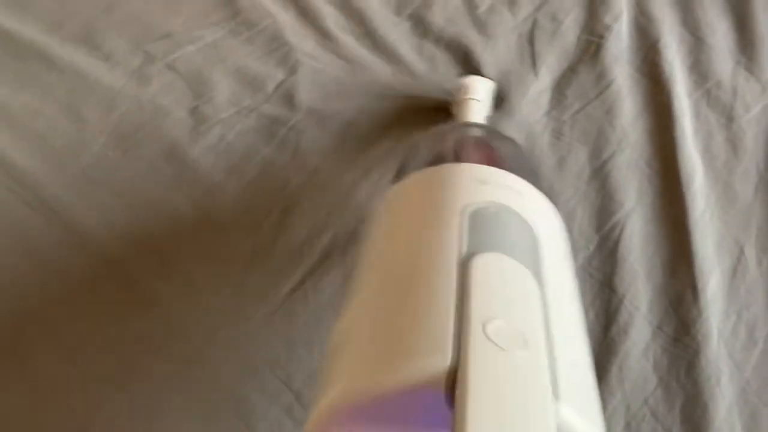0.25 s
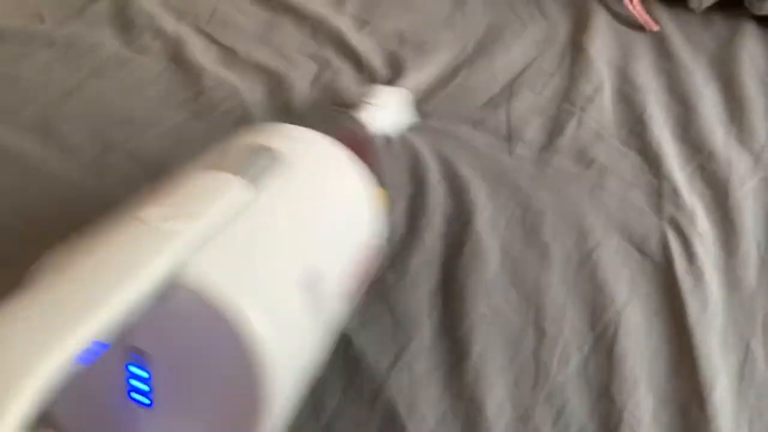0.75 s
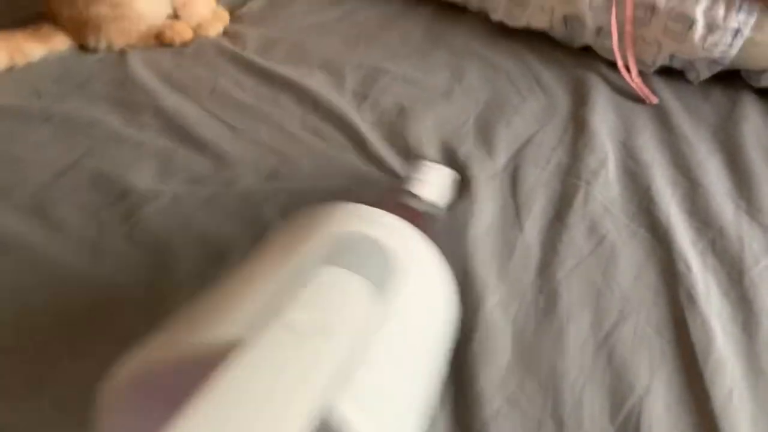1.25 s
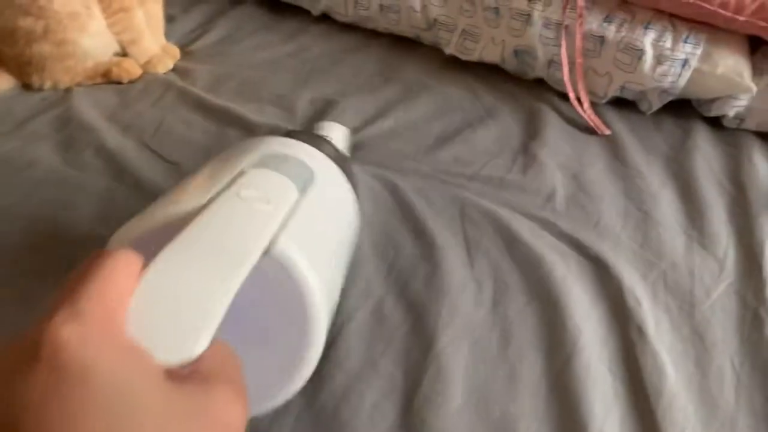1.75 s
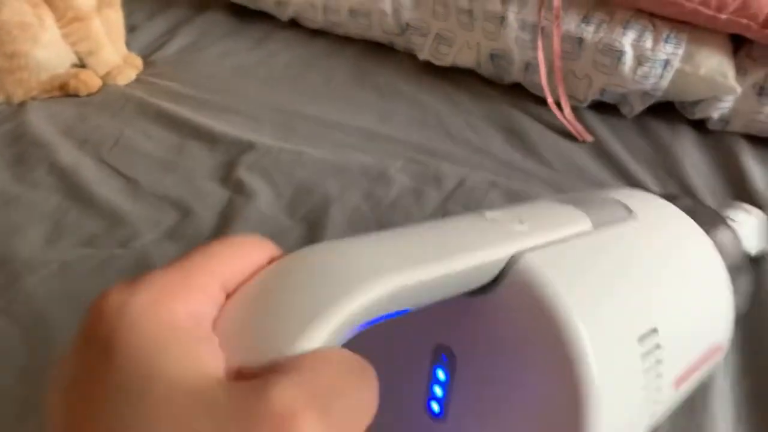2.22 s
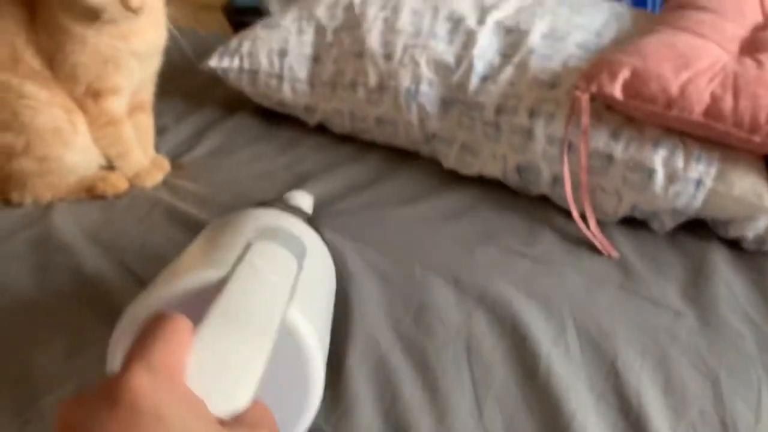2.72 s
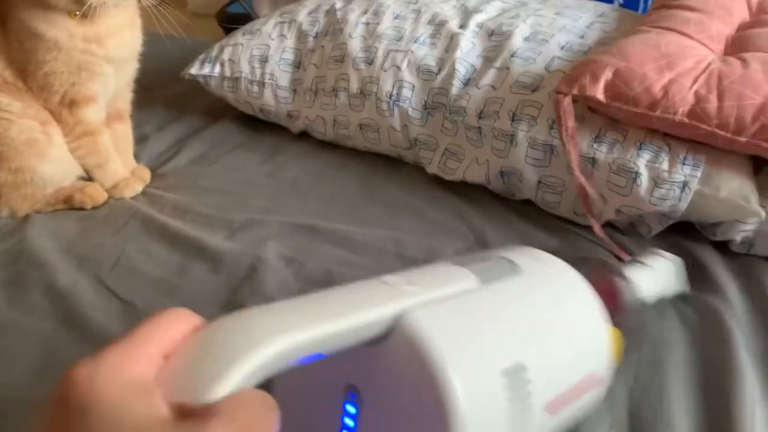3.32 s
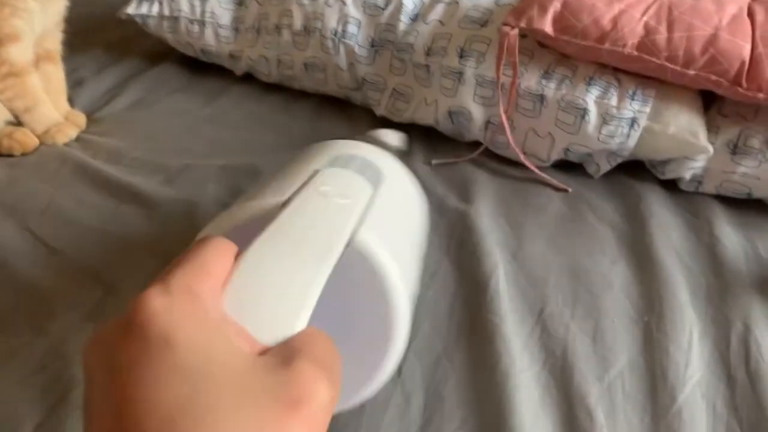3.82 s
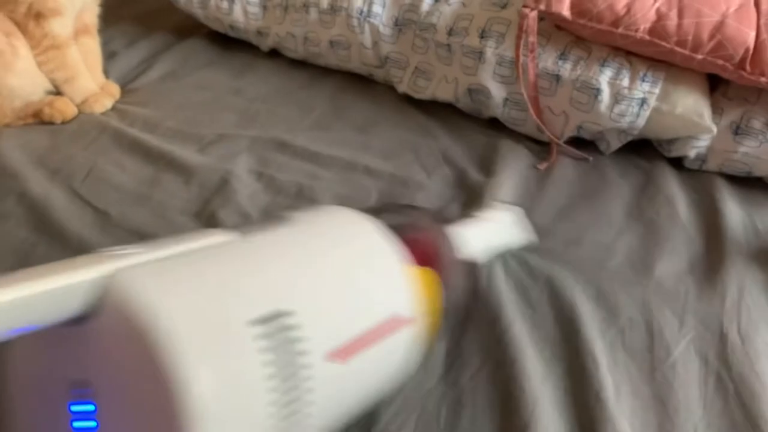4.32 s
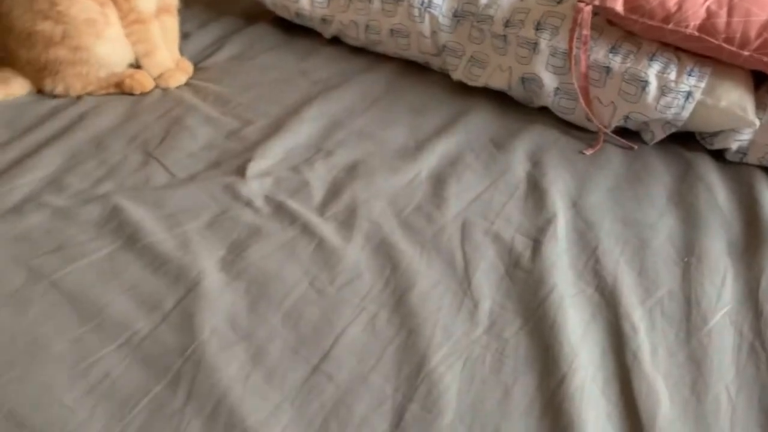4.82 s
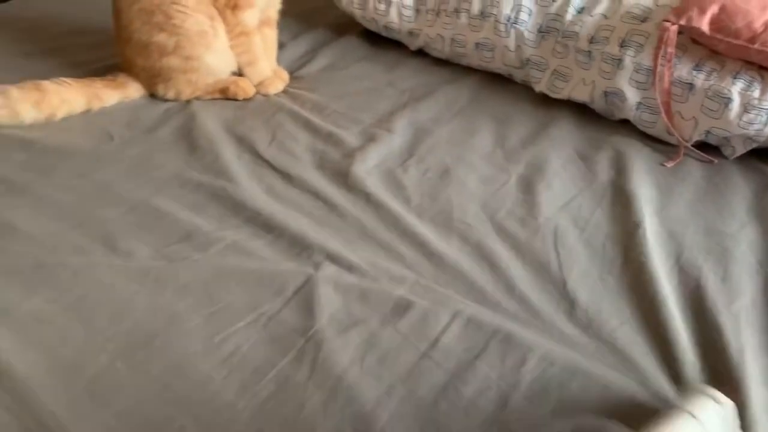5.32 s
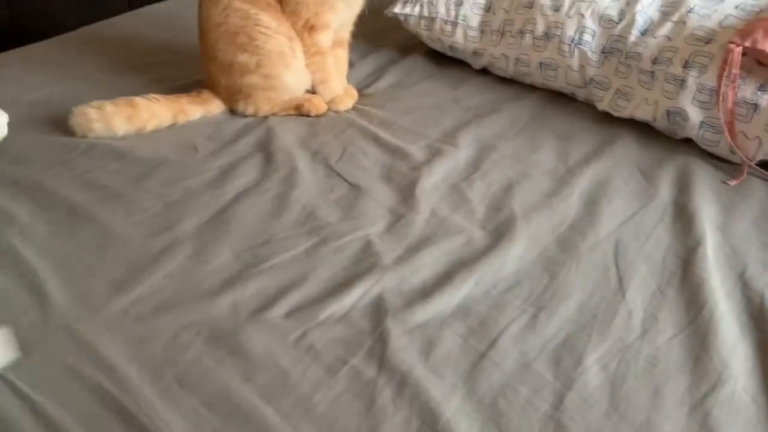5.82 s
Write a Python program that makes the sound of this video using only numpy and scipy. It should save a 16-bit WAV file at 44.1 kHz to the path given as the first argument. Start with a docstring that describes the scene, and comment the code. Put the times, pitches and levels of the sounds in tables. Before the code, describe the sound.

A phone close to a small vacuum catches its motor already turning and rising in pitch, with a thin electronic tone at first and brief ringing from the plastic housing. A bright whine emerges within a second and shifts between left and right as the machine is swept. Air roars steadily, surging and hissing with each nozzle stroke on cloth, over a faint low room drone.

```python
"""A cordless hand vacuum spins up and is swept to and fro over a bed sheet, close to a phone.
Over a steady room drone the shaft hum climbs, beside a thin tone that soon sinks; the housing rings
as the rising harmonics pass through it. Air noise and a singing bearing grow, then the seven-blade fan
whines and whistles. Six strokes each lift the rush, hiss, hollow nozzle note, buzz and whistle.
Tones are sines locked to the shaft's turning, except the thin one; air and room are coloured noise."""
import sys
import numpy as np
from scipy import signal
from scipy.fft import rfft, irfft, next_fast_len
from scipy.io import wavfile
from scipy.ndimage import map_coordinates

SR = 44100
rng = np.random.default_rng(int(sys.argv[2]) if len(sys.argv) > 2 else 0)


def store_pcm(level_fs):
    """Save levels as 16-bit WAV."""
    pcm = np.round(np.clip(level_fs, -1, 1) * 32767).astype(np.int16)
    wavfile.write(sys.argv[1], SR, np.atleast_2d(pcm).T)


N = 267246
TIME = np.arange(N) / SR  # seconds

# The room's steady drone: pitch_hz, relative level_db (per Hz)
ROOM_SPECTRUM = [(20, -32), (31, -28), (40, -8), (50, 0.5), (65, -10), (110, -21), (300, -12),
                 (1000, -35.5)]
# How alike noise is at the two microphones: pitch_hz, correlation (-1 to 1)
LIKENESS = [(60, .95), (250, .75), (700, .45), (1300, -.25), (1700, -.08), (3200, -.39), (4500, .44),
            (5700, .07), (6750, -.98), (7300, -.98), (8400, .8), (9700, .55), (10600, .72), (11000, -.98),
            (12200, -.98), (12450, .95), (13400, .95), (13600, .45)]
# Balance of noise between the microphones: pitch_hz, left_minus_right_db
BALANCE = [(110, -.5), (200, -1), (380, -3), (700, 6.5), (1290, 3), (2380, 1), (4400, -0.5)]

# Soft start: the shaft rate rises evenly from this value for this long
START_HZ, SOFT_START_S = 232, .36
# Free run-up: full shaft rate, time constant, time the motor has already been turning
FULL_HZ, RUN_UP_S, HEAD_START_S = 439.4, .726, .418
# The last few turns a second come slowly
CREEP_HZ, CREEP_S = 5.4, 1.56
# The motor sags a little just after each stroke has pressed the nozzle down
SAG_HZ, SAG_LATE_S, SAG_S = 1.4, .12, .3
# Strokes over the sheet: far_end_s, half_length_s, rush_rise_db, hiss_rise_db, hollow_rise_db,
# buzz_rise_db, whistle_rise_db, whistle_late_s
STROKES = [(0.54, 0.24, 4, 8.5, 4, 1, 3, .1), (1.411, 0.32, 4.5, 5, 5.5, 5, 10.5, 0.0088),
           (2.251, 0.24, 6, 6, 13.5, 5.5, 10, 0.18), (3.207, 0.2, 2.5, 5, 13.5, 3, 9, 0.083),
           (4.168, 0.33, 5, 9.5, 10, 4, 15, 0.02), (5.345, 0.44, 7, 9, 3.5, 11.5, 11, 0.066)]
HOLLOW_EARLY_S = 0.11  # the hollow note comes as the nozzle seals

# Hum of the unbalanced shaft: time_s, level_db
HUM_LEVEL = [(0, -46), (.06, -38.5), (.15, -60), (.3, -45.5), (.62, -43), (.7, -30.5), (.88, -36.5),
             (1.25, -30.5), (1.68, -38), (2.25, -34), (2.76, -37.5), (3.3, -34), (3.69, -38), (4.2, -32.5),
             (4.58, -47), (4.78, -49.5), (5.12, -30.5), (6.05, -38)]
HUM_PAN_DB, HUM_LAG_S = -0.4, 0.00043  # left minus right; the right microphone hears it later
# Thin tone, likely the speed controller's switching: levels under starting current and when running
DRIVE_HZ, DRIVE_START_DB, DRIVE_RUNNING_DB, DRIVE_SETTLE_S = 2013, -42.5, -54.7, .19
# Housing resonances: shaft_multiple (times the shaft rate), pitch_hz, width_hz, peak_db
CASING = [(5, 1235, 130, -38.5), (7, 1780, 130, -50), (7, 2080, 680, -55), (6, 2440, 190, -51.5),
          (10, 2980, 640, -54), (14, 4200, 290, -46), (14, 4860, 230, -50.5), (14, 5300, 700, -55),
          (14, 5860, 120, -46), (14, 6000, 40, -49), (13, 5560, 40, -52), (13, 5615, 30, -47),
          (18, 4700, 420, -60), (20, 5450, 1800, -61), (20, 6400, 220, -53), (20, 8200, 350, -50.5),
          (20, 8630, 40, -44), (21, 8500, 800, -48), (22, 8350, 300, -45)]
# Weaker shaft harmonics: shaft_multiple (times the shaft rate), level_db (full speed, between strokes),
# buzz_share (of a stroke's buzz), growth_db (per tenfold speed)
OVERTONES = [(5, -59, .7, 80), (6, -54, .95, 130), (8, -63, 1, 100), (9, -61, .8, 60),
             (13, -55.5, 1.15, 330), (14, -55.5, 1, 160), (17, -63.5, 1.1, 130), (18, -57, .9, 130),
             (20, -53.5, .9, 130), (25, -58, .9, 130), (28, -53.5, .6, 110), (32, -61, .7, 250),
             (33, -66, .7, 250)]
# Tenth harmonic, likely the commutator, rings out when the side vents face the phone: time_s, level_db
RING_LEVEL = [(0, -74), (.35, -63), (.54, -48), (.72, -54), (.85, -47), (1.0, -45), (1.2, -48), (1.4, -47),
              (1.5, -48), (1.62, -41), (1.95, -50), (2.36, -36), (2.6, -49.5), (2.85, -49.5), (3.1, -48.5),
              (3.5, -51), (3.9, -48.5), (4.15, -42.5), (4.45, -50), (4.7, -51), (5.05, -52), (5.2, -36.5),
              (5.3, -46), (5.45, -36.5), (5.7, -52.5), (6.05, -48)]
RING_MULTIPLE = 10
# Ball bearing: ball_multiple (times the ball-passing rate), level_db (full speed, between strokes),
# buzz_share (of a stroke's buzz), growth_db (per tenfold speed)
BEARING = [(1, -49.5, .3, 75), (3, -54.5, .9, 120)]
BALL_PASSES = 2.566  # per turn of the shaft

# Air noise colours: pitch_hz, relative level_db (per Hz)
# Low turbulence coloured by the housing
RUMBLE_SPECTRUM = [(20, -38), (31, -34), (45, -3.5), (68, -5), (100, -3.5), (160, -0.5), (260, 2), (400, 3),
                   (500, -6.5), (800, -35.5)]
# Rush from the vents
RUSH_SPECTRUM = [(300, -22), (520, -2), (720, 2.5), (900, 0.5), (1200, 1), (1600, -2.5), (2050, 1.5),
                 (2300, 1.5), (2650, -5), (3100, 1), (3450, 2), (3650, -5.5), (4400, -1), (5000, -6),
                 (6000, -1), (7500, -5.5), (12000, -13)]
# Hiss where the nozzle meets the sheet
HISS_SPECTRUM = [(2400, -38), (3500, -7), (4400, 0), (5000, -4), (6200, -19), (7000, -42), (8000, 2),
                 (8700, 2.5), (9200, 9), (9700, 5), (10500, 4), (11500, 1), (12600, 1), (13600, -5.5),
                 (14300, 0), (15500, -39)]
# Hollow resonance of the nozzle
HOLLOW_SPECTRUM = [(900, -24), (1300, -5), (1480, 1), (1650, 2), (1850, -15), (2200, -37)]
# Air levels at full speed between strokes, before the reflection; growth in dB per tenfold speed
RUMBLE_DB, RUSH_DB, HISS_DB, HOLLOW_DB = -42.5, -38.5, -39.5, -54
RUMBLE_GROWTH_DB, RUSH_GROWTH_DB, HISS_GROWTH_DB, HOLLOW_GROWTH_DB = 18, 26, 61, 16
RUMBLE_SHARE = 0.65  # of the rush's rise in each stroke

BLADES = 7
# Blade-passing whine, beamed from the vents: time_s, level_db
WHINE_LEVEL = [(0, -62), (.64, -60), (.69, -42), (.94, -34), (.97, -29.8), (1.15, -27.6), (1.45, -30.5),
               (1.67, -27.7), (2.02, -32.3), (2.06, -36.5), (2.11, -31.5), (2.29, -28), (2.44, -28.4),
               (2.52, -29.7), (2.59, -33), (2.63, -37), (2.77, -39), (2.83, -45.5), (2.86, -32.7),
               (3.01, -28.8), (3.4, -28.4), (3.53, -36.5), (3.62, -49), (3.7, -42), (3.78, -34), (3.9, -30),
               (4.03, -30.3), (4.12, -26), (4.33, -32), (4.48, -29.8), (4.69, -36.5), (4.78, -30),
               (4.87, -31.5), (4.97, -28), (5.06, -28), (5.21, -25.3), (5.44, -29.2), (5.53, -27.4),
               (5.62, -34), (5.68, -34.3), (5.74, -45.5), (5.77, -36.6), (6.05, -43)]
# Where the whine's beam points: time_s, left_minus_right_db
WHINE_PAN = [(.68, 11.7), (1.04, -1.2), (1.14, -1), (1.18, -4.3), (1.52, -5.5), (2.02, -5), (2.06, -1),
             (2.13, -4.5), (2.33, -.3), (2.5, -1), (2.62, -3.5), (2.99, -5.2), (3.08, 2), (3.29, -4.9),
             (3.44, 1.1), (3.59, -6.7), (4.19, 5.4), (4.43, -6.3), (4.88, .6), (4.97, -4.5), (5.12, 4),
             (5.45, -4.5), (5.6, 7.3), (5.87, -5.3), (6.05, 0)]
# Its extra path to the right microphone as the machine turns: time_s, path_m
WHINE_PATH = [(.72, .075), (.84, .096), (1.11, .072), (1.14, .057), (1.17, .051), (1.3, .054), (1.45, .068),
              (1.71, .084), (1.96, .063), (2.04, .072), (2.07, .057), (2.31, .037), (2.44, .045),
              (2.55, .065), (2.64, .072), (2.82, .028), (2.85, .055), (3.15, .039), (3.27, .058),
              (3.37, .059), (3.54, .086), (3.65, .056), (3.77, .08), (3.85, .062), (3.98, .05),
              (4.11, .059), (4.35, .113), (4.71, .146), (4.83, .138), (5.1, .069), (5.22, .053),
              (5.43, .067), (5.58, .095), (5.64, .131), (6.05, .155)]
SOUND_M_S = 343
# The whistle leaves the duct freely only above its cut-on pitch
WHISTLE_DB, WHISTLE_GROWTH_DB, CUT_ON_LOSS_DB = -42, 110, 34
CUT_ON_HZ, CUT_ON_WIDTH_HZ = 9026, 8
TOP_HZ = 15500  # the phone's upper limit


def undb(db):
    """Turn decibels into gain."""
    return 10 ** (np.asarray(db) / 20)


def over_time(table):
    """Join (time, value) points by straight lines."""
    time_s, value = np.transpose(table)
    return np.interp(TIME, time_s, value)


def over_hz(points, hz):
    """Read (pitch, value) points along a log-pitch axis, as hearing spaces pitch."""
    pitch_hz, value = np.transpose(points)
    return np.interp(np.log(hz + 1), np.log(pitch_hz), value)


def wander(rate):
    """Smooth chance: `rate` random values a second joined by a spline."""
    points = rng.standard_normal(4096)
    coarse_time = TIME[::64]
    coarse = map_coordinates(points, [coarse_time * rate], mode="wrap")
    return np.interp(TIME, coarse_time, coarse)


def swell(at_s, half_s):
    """A smooth rise and fall round one moment."""
    return np.exp(-((TIME - at_s) / half_s) ** 2)


def tone(phase, db):
    """A sine of the given rms level."""
    return np.sqrt(2) * undb(db) * np.sin(phase)


def beamed(phase, db, pan_db, lag_s):
    """A strong tone that reaches each microphone with its own level and delay."""
    lead = np.gradient(phase) * SR * lag_s
    left = tone(phase + lead / 2, db + pan_db / 2)
    right = tone(phase - lead / 2, db - pan_db / 2)
    return np.array([left, right])


def scattered(phase, db, fade_db, sway):
    """A weak tone whose reflections add and cancel as the machine moves, apart at each microphone."""
    hz = np.abs(np.gradient(phase)) * SR / (2 * np.pi)
    lead = np.arccos(over_hz(LIKENESS, hz))  # pitch sets the phase gap between microphones
    phase = phase + .5 * wander(12)
    db = db + fade_db * wander(6) + 1.5 * wander(30)
    left = tone(phase + lead / 2 + sway * wander(2.873), db)
    right = tone(phase - lead / 2 + sway * wander(2.873), db)
    return np.array([left, right])


def turbulence(spectrum, db):
    """Coloured noise at two microphones, alike or opposed depending on the wavelength."""
    size = next_fast_len(N)
    hz = np.fft.rfftfreq(size, 1 / SR)
    alike = over_hz(LIKENESS, hz)
    mid = rfft(rng.standard_normal(size)) * np.sqrt(1 + alike)
    side = rfft(rng.standard_normal(size)) * np.sqrt(1 - alike)
    lean = undb(over_hz(BALANCE, hz) / 2)
    both = np.array([(mid + side) * lean, (mid - side) / lean])
    pair = irfft(both * undb(over_hz(spectrum, hz)), size)[:, :N]
    return pair * undb(db) / pair.std()


def room():
    """The room's low drone is steady coloured noise."""
    return turbulence(ROOM_SPECTRUM, -53)


def shaft():
    """Turns a second: an even soft start, then steady torque against drag that grows as speed squared."""
    run_up = FULL_HZ * np.tanh((TIME + HEAD_START_S) / RUN_UP_S)
    creep = CREEP_HZ * np.exp(-TIME / CREEP_S)
    load = sum(swell(far_end_s + SAG_LATE_S, SAG_S) for far_end_s, *_ in STROKES)
    free = run_up - creep - SAG_HZ * load
    ramp_end_hz = np.interp(SOFT_START_S, TIME, free)
    ramp = np.interp(TIME, [0, SOFT_START_S], [START_HZ, ramp_end_hz])
    return np.where(TIME < SOFT_START_S, ramp, free)


def hum(angle):
    """The unbalanced shaft shakes the machine once each turn."""
    level_db = over_time(HUM_LEVEL) + wander(46)
    return beamed(angle, level_db, HUM_PAN_DB, HUM_LAG_S)


def drive():
    """The thin steady tone is loudest under the starting current and then sinks into the rush."""
    inrush = np.exp(-(TIME / DRIVE_SETTLE_S) ** 2)
    level_db = DRIVE_RUNNING_DB + (DRIVE_START_DB - DRIVE_RUNNING_DB) * inrush
    return scattered(2 * np.pi * DRIVE_HZ * TIME, level_db, fade_db=1.2, sway=.2)


def casing(angle, shaft_hz):
    """Each housing resonance sings briefly while a rising harmonic passes through it."""
    out = 0
    for multiple, pitch_hz, width_hz, peak_db in CASING:
        detune = 2 * (multiple * shaft_hz - pitch_hz) / width_hz
        harmonic = scattered(multiple * angle, peak_db, fade_db=.5, sway=.1)
        out = out + harmonic / (1 + detune ** 4)
    return out


def overtones(angle, speed, buzz_db):
    """Shaft harmonics grow with speed and buzz more under the load of each stroke."""
    out = 0
    for multiple, level_db, share, growth_db in OVERTONES:
        level_db = level_db + growth_db * speed + share * buzz_db
        out = out + scattered(multiple * angle, level_db, fade_db=2.5, sway=.3)
    return out


def commutator(angle):
    """The tenth harmonic rings out when the side vents face the phone."""
    return scattered(RING_MULTIPLE * angle, over_time(RING_LEVEL), fade_db=.5, sway=.2)


def bearing(angle, speed, buzz_db):
    """The balls passing by make tones that grow with speed and under the load of each stroke."""
    out = 0
    for multiple, level_db, share, growth_db in BEARING:
        level_db = level_db + growth_db * speed + share * buzz_db
        out = out + scattered(multiple * BALL_PASSES * angle, level_db, fade_db=1.5, sway=.2)
    return out


def bounced(pair, lag_s=.0022, sway_s=0.0005):
    """A nearby reflection whose path changes with the sweeping arm: a slowly moving comb."""
    earlier = TIME - lag_s - sway_s * wander(2.5)
    reflection = np.array([np.interp(earlier, TIME, x) for x in pair])
    return pair + .28 * reflection


def air(speed, rush_db, hiss_db, hollow_db):
    """Rumble of the body, rush from the vents, hiss and a hollow note where the nozzle meets the sheet."""
    rumble_db = RUMBLE_GROWTH_DB * speed + RUMBLE_SHARE * rush_db + 0.24 * wander(27)
    rumble = turbulence(RUMBLE_SPECTRUM, RUMBLE_DB) * undb(rumble_db)
    rush_db = RUSH_GROWTH_DB * speed + rush_db + .7 * wander(40)
    rush = turbulence(RUSH_SPECTRUM, RUSH_DB) * undb(rush_db)
    hiss_db = HISS_GROWTH_DB * speed + hiss_db + wander(40) + wander(13)
    hiss = turbulence(HISS_SPECTRUM, HISS_DB) * undb(hiss_db)
    hollow_db = HOLLOW_GROWTH_DB * speed + hollow_db
    hollow = turbulence(HOLLOW_SPECTRUM, HOLLOW_DB) * undb(hollow_db)
    return rumble + bounced(rush + hiss + hollow)


def strokes():
    """Each stroke lifts rush, hiss, hollow note, buzz and whistle (dB) as the nozzle drags on the sheet."""
    rush = hiss = hollow = buzz = whistle_rise = 0
    for far_end_s, half_s, rush_db, hiss_db, hollow_db, buzz_db, whistle_db, late_s in STROKES:
        drag = swell(far_end_s, half_s)
        rush = rush + rush_db * drag
        hiss = hiss + hiss_db * drag
        hollow = hollow + hollow_db * swell(far_end_s - HOLLOW_EARLY_S, 1.3 * half_s)
        buzz = buzz + buzz_db * drag
        whistle_rise = whistle_rise + whistle_db * swell(far_end_s + late_s, half_s)
    return rush, hiss, hollow, buzz, whistle_rise


def whine(angle):
    """Seven blades pass in each turn and make a clean, even tone, beamed from the vents."""
    level_db = over_time(WHINE_LEVEL) + .6 * wander(40)
    lag_s = over_time(WHINE_PATH) / SOUND_M_S
    return beamed(BLADES * angle, level_db, over_time(WHINE_PAN), lag_s)


def whistle(angle, shaft_hz, speed, stroke_db):
    """Three times the blade pitch, made rough by uneven inflow and held back below the duct's cut-on."""
    multiple = 3 * BLADES
    trapped = (1 - np.tanh((multiple * shaft_hz - CUT_ON_HZ) / CUT_ON_WIDTH_HZ)) / 2
    level_db = WHISTLE_DB + stroke_db - CUT_ON_LOSS_DB * trapped + WHISTLE_GROWTH_DB * speed
    level_db = level_db + 1.36 * wander(90) + wander(12)
    return tone(multiple * angle + 0.44 * wander(150), level_db)


def scene():
    """One shaft drives all tones but the thin one, its angle trembling; strokes swell tones and air."""
    shaft_hz = shaft()
    speed = np.log10(shaft_hz / FULL_HZ)  # tenfold steps relative to full speed
    angle = 2 * np.pi * np.cumsum(shaft_hz) / SR + 0.0038 * wander(21.3)
    rush_db, hiss_db, hollow_db, buzz_db, whistle_db = strokes()
    out = room() + hum(angle) + drive() + casing(angle, shaft_hz)
    out = out + overtones(angle, speed, buzz_db) + commutator(angle) + bearing(angle, speed, buzz_db)
    out = out + air(speed, rush_db, hiss_db, hollow_db)
    return out + whine(angle) + whistle(angle, shaft_hz, speed, whistle_db)


def record(dry):
    """The phone cuts the top with a steep low-pass filter."""
    low_pass = signal.ellip(8, .2, 70, TOP_HZ, fs=SR, output="sos")
    return signal.sosfilt(low_pass, dry)


dry = scene()
out = record(dry)
store_pcm(out)
```